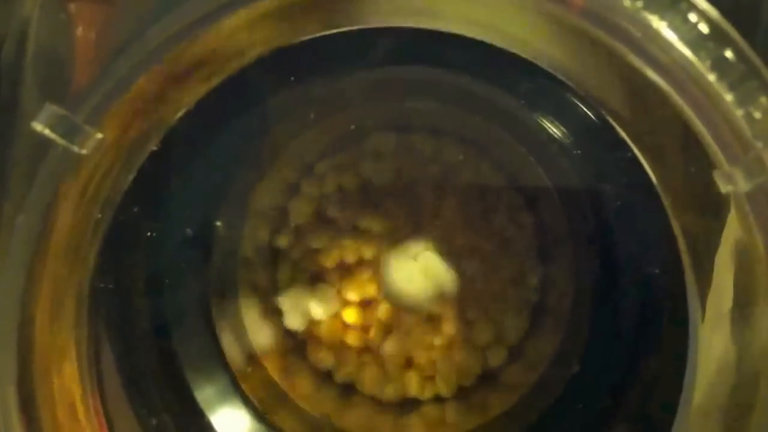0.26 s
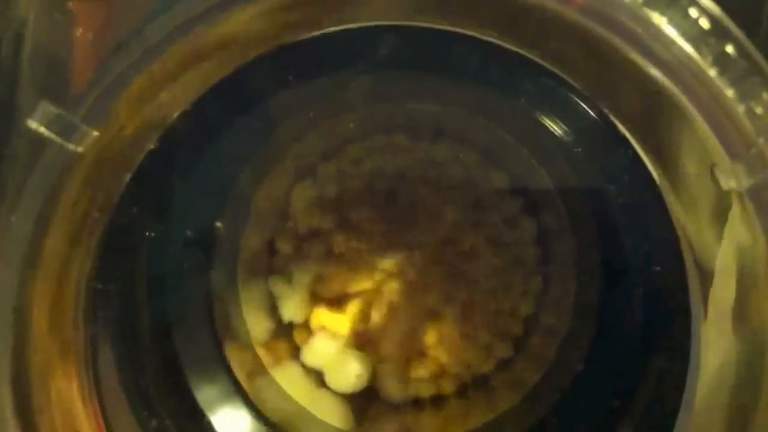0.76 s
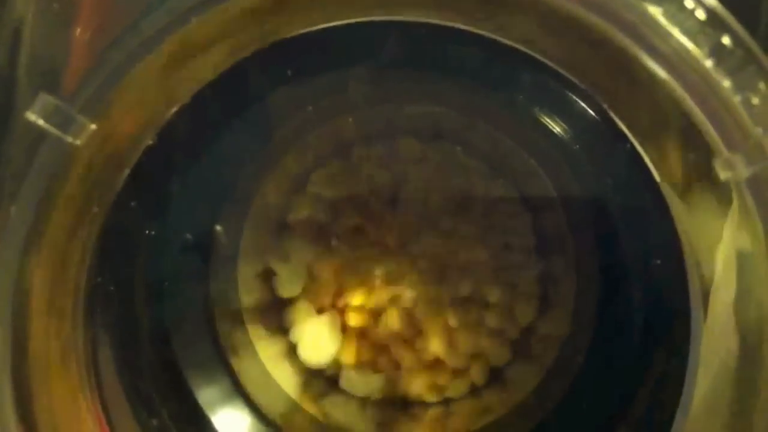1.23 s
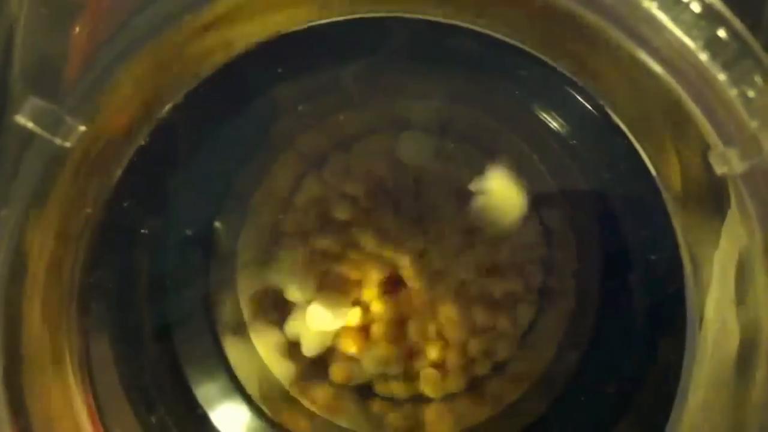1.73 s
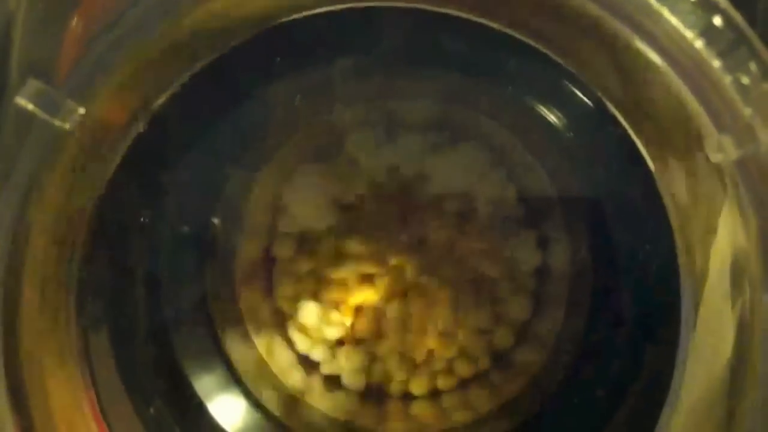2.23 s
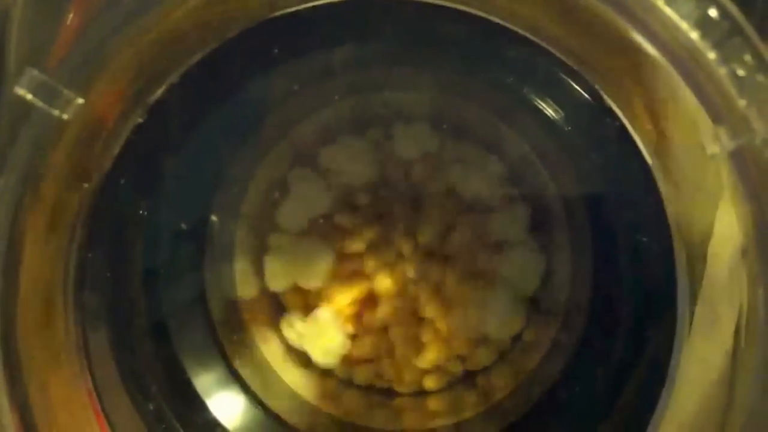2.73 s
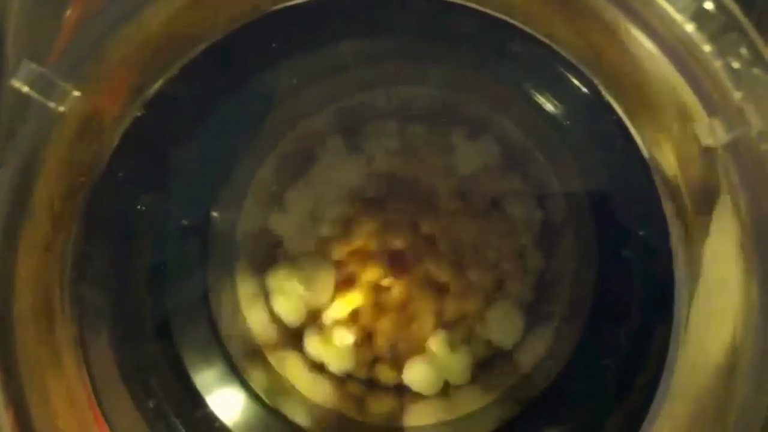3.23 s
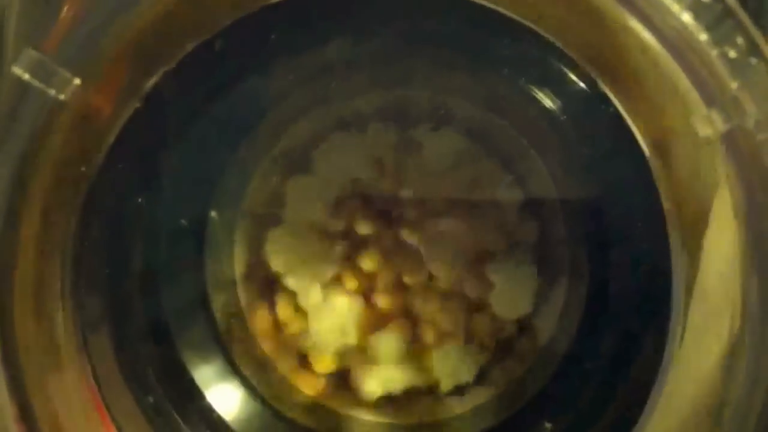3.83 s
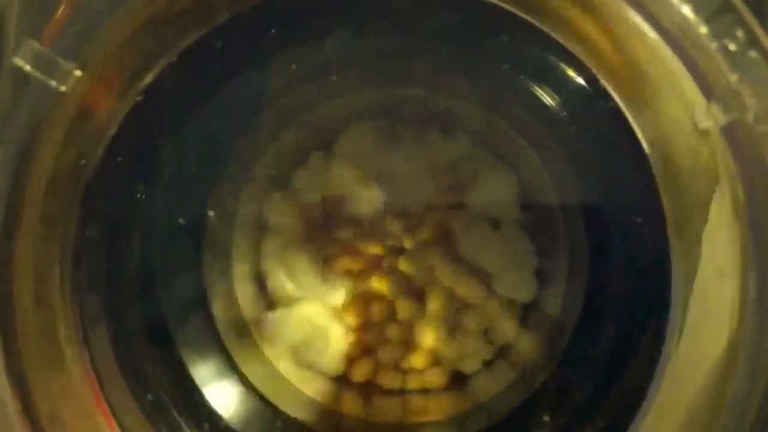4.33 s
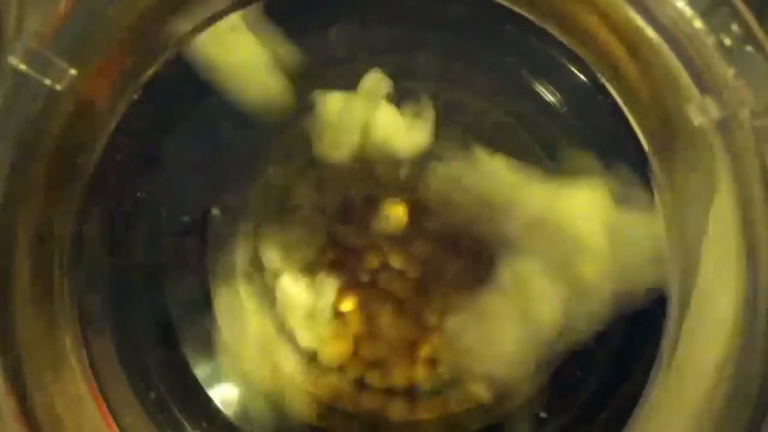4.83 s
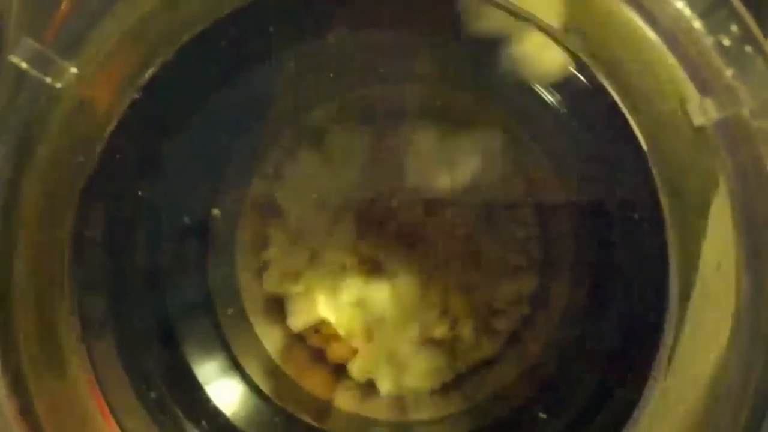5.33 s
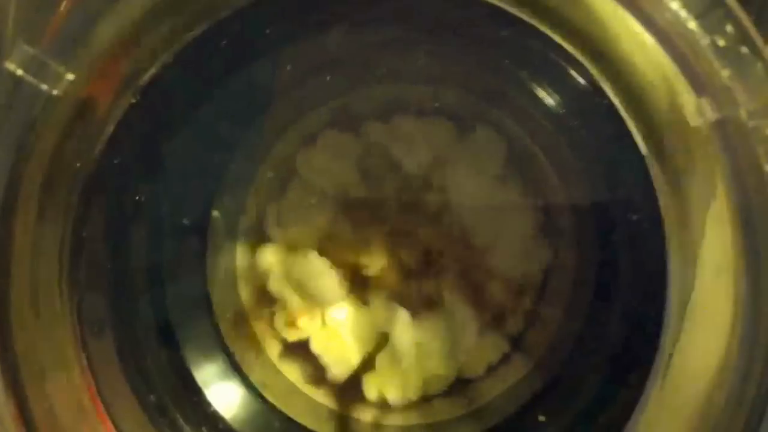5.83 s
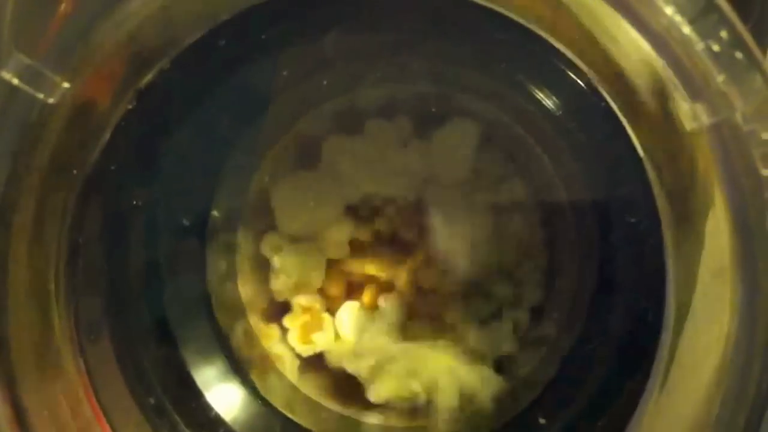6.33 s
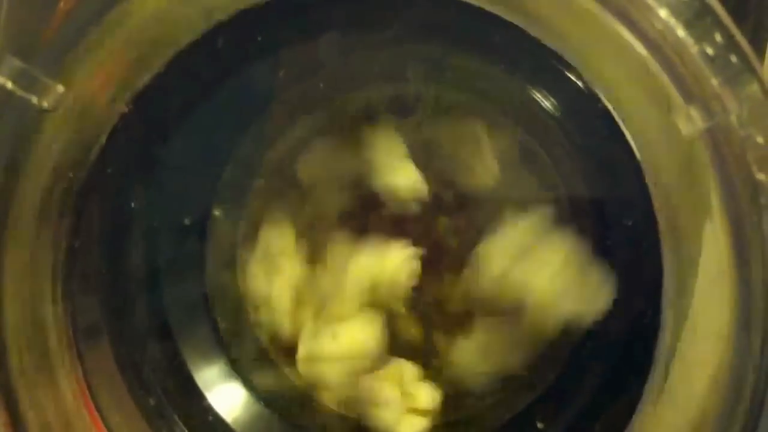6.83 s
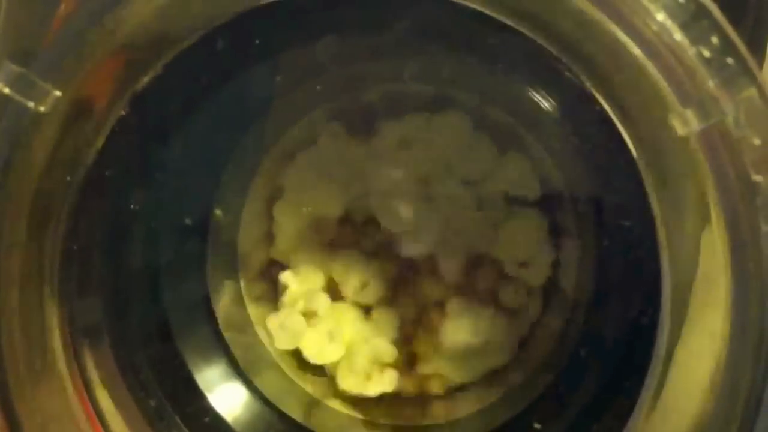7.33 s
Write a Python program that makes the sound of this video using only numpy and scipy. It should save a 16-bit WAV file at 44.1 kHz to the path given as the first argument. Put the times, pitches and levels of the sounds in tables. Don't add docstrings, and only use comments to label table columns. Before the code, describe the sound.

Close above a whirring popcorn machine, blown air rushes through a metal cup as scattered corn pops snap, some crisp, some dull and deep.

```python
import sys
import numpy as np
from scipy import signal
from scipy.fft import rfft, irfft
from scipy.io import wavfile
from scipy.ndimage import uniform_filter1d

SR = 44100
rng = np.random.default_rng(int(sys.argv[2]) if len(sys.argv) > 2 else 0)


def master_out(mix):
    frames = np.transpose(np.atleast_2d(mix))
    ceiling = np.clip(frames, -1, 1)
    pcm = np.round(ceiling * 32767).astype(np.int16)
    wavfile.write(sys.argv[1], SR, pcm)


def linear_from_db(decibels):
    return 10 ** (np.asarray(decibels, float) / 20)


N = 333396

# [t/s, crack rms level/dB, low cup mode/dB, body under the crack/dB, brightness/dB per octave]
MOUTH_POPS = [(1.8812, -14, 20, -6, 6), (1.9094, -25, 13, -1, 7), (2.409, -23, 8, -19, 1),
              (3.87, -24, 20, -15, -4), (4.2734, -22, 10, -18, 3), (5.0144, -20, 16, -8, -2),
              (5.88, -21, 12, -14, 4.5), (6.7573, -19, 11, -16, 2.5), (5.001, -8, 15, -8, -2.5),
              (6.7168, -9.5, 17, -6, -4), (6.8346, -11, 16.5, -9, 1), (7.0918, -18, 9, -5, 5)]
DEEP_POPS = [
    (2.9914, -18, 18, -10, 0),
    (4.3174, -25, 13, -11, -5),
    (4.6254, -19.5, 18, -8, -17),
    (4.8412, -17.5, 17, 0, -1.5),
    (4.8902, -19, 14, -5, -2),
    (7.3878, -21, 22, -12, 6),
]
# [f/Hz, level/dB per Hz]
HULL_CRACK = [(1500, -32), (2500, -0.5), (4000, 0), (6000, 1), (9000, -4), (12000, -6.5), (15500, -26),
              (17000, -72)]
# [f/Hz, width/Hz, lift/dB]
CUP_MODES = [(2450, 600, -6), (4280, 330, -12), (4950, 950, 12), (5800, 380, -9), (6450, 700, 8.5),
             (7800, 700, 6), (9900, 1200, 4.5)]
# [t/s, f/Hz]
SHAFT_SPEED = [
    (0., 231.8),
    (3.65, 233.35),
    (4.15, 232.4),
    (5.4, 232.8),
    (6., 232.7),
    (7.56, 233.25),
]
# [multiple of shaft speed, rms level midway/dB, trend as the cup fills/dB per s]
SHAFT_ORDERS = [(1, -26.1, 0), (2, -38, -.4), (3, -35.8, 1.3), (4, -31.5, -.6), (7, -44, 0), (8, -40, -.5),
                (9, -44.5, .7), (10, -44.5, .1), (11, -43.3, -.7), (12, -44.5, -1.6), (14, -44, -.8),
                (16, -46.5, .4), (18, -49, -1.1), (25, -46, -.2)]
# [f/Hz, level/dB per Hz]
AIR_ROAR = [(60, -50), (100, -54), (150, -25.5), (700, -9), (1350, -19.5), (5500, -22), (11800, -37.5),
            (15500, -52)]
# [f/Hz, width/Hz, lift/dB]
CHAMBER_MODES = [(313, 34, 8), (409.4, 15, 7.5), (850.5, 58, 5.5), (973, 380, 14.5), (1458, 33, 5.5),
                 (1747, 139, 7), (2085, 130, -5.5), (3222, 190, 7.5), (3530, 130, 4.5), (4456, 36, 6.5),
                 (4980, 49, 6), (5350, 47, 7), (6430, 520, 4), (9900, 460, 1),
                 (6120, 450, -8)]
# [t/s, drop/dB, recovery/dB per s]
GAIN_DUCKS = [
    (5.005, 5, 3),
    (6.719, 4.5, 10),
    (6.838, 3, 1),
]
# [f/Hz, share 0-1]
TOP_BAND_KEPT = [(9000, .99), (11000, .88), (12500, .55), (13400, .28), (14200, .035), (15100, .012),
                 (15800, .001)]

MOUTH_MODE_HZ, DEEP_MODE_HZ = 3600, 3100
MOUTH_THUMP_HZ, DEEP_THUMP_HZ = 160, 240
FAINT_ORDERS = (5, 13, 15, 17, 20, 28, 30, 31, 39)


def pop(row, low_hz, thump_hz, chance):
    _, db, low_db, body_db, bright_db = row
    tear, steam = chance
    t = np.arange(len(tear)) / SR
    rise = 1 - np.exp(-t / .0004)
    tear_s = .0044 * linear_from_db(.3 * (-8 - db))
    cracks = np.sign(tear) * rise * np.exp(-(t / tear_s) ** 3)
    hiss = steam * rise * linear_from_db(-60 * t / .085)

    hz = np.fft.rfftfreq(len(t), 1 / SR)
    colour_db = lifted(HULL_CRACK, CUP_MODES + [(low_hz, 950, low_db)], hz)
    colour_db = colour_db + bright_db * np.log2(np.maximum(hz / 4000, 1))
    own_db = 10 * np.log10(uniform_filter1d(abs(rfft(cracks)) ** 2, size=30))
    crack = coloured(cracks, colour_db - own_db + own_db.mean())
    steam_tilt_db = 3.5 * np.log2(hz / 4000 + 0.12)
    crack = crack + linear_from_db(-7.5) * coloured(hiss, colour_db + steam_tilt_db)

    body = resonate(resonate(cracks + .45 * hiss, 1500, 1100), 1500, 1100)
    swell = np.sin(np.pi * np.minimum(t * thump_hz / 2, 1)) ** 2
    thump = np.sin(2 * np.pi * thump_hz * t) * swell
    thump_db = -11 + 10 * (low_hz < MOUTH_MODE_HZ)

    scale = np.sqrt(tear_s * SR)
    crack = scale * crack / np.linalg.norm(crack)
    body = scale * body / np.linalg.norm(body)
    return linear_from_db(db) * (crack + linear_from_db(body_db) * (body + linear_from_db(thump_db) * thump))


def motor(waver_db=2.1):
    s, hz = np.transpose(SHAFT_SPEED)
    t = np.arange(N) / SR
    orders = SHAFT_ORDERS + [(k, -42 - .42 * k, 0) for k in FAINT_ORDERS]
    jitter, *wavers = drift(8, count=len(orders) + 1)
    speed_hz = np.interp(t, s, hz) + .12 * jitter
    turn = 2 * np.pi * np.cumsum(speed_hz) / SR
    out = np.zeros(N)
    for (k, db, trend_db), waver, start in zip(orders, wavers, rng.random(len(wavers))):
        depth_db = waver_db * min(.12 * k ** 1.2, 1)
        level_db = db + trend_db * (t - t.mean()) + depth_db * (waver - .4)
        out += np.sqrt(2) * linear_from_db(level_db) * np.cos(k * turn + 2 * np.pi * start)
    return out


def air(level_db=-17.5, patchy_db=0.78, hiss_db_per_s=-0.29):
    frames, hz = N // 512 + 5, np.fft.rfftfreq(2048, 1 / SR)
    a, b, patches = rng.standard_normal((frames, 1025, 3)).T
    patches = evened(uniform_filter1d(uniform_filter1d(patches, 16, 0), 8, 1))
    ripple_db = 1.3 * evened(uniform_filter1d(rng.standard_normal(1025), 2)) * (hz > 1300)
    from_middle_s = (np.arange(frames) - frames / 2) * 512 / SR
    hiss_db = np.outer(hz > 2000, hiss_db_per_s * from_middle_s)
    steady_db = lifted(AIR_ROAR, CHAMBER_MODES, hz) + ripple_db
    z = (a + 1j * b) * linear_from_db(steady_db[:, None] + patchy_db * patches + hiss_db)
    roar = signal.istft(z, nperseg=2048, noverlap=1536)[1][:N]
    return linear_from_db(level_db) * evened(roar)


def rattle(level_db=-46, ticks_per_s=180):
    strength = linear_from_db(3.5 * np.minimum(rng.exponential(1, N), 4))
    ticks = strength * (rng.random(N) < ticks_per_s / SR)
    spot = rng.integers(0, 8, N)
    out = np.zeros(N)
    for k, hz in enumerate(np.geomspace(2600, 9000, num=8)):
        out += resonate(resonate(ticks * (spot == k), hz, 700), hz, 700) * linear_from_db(-3.0 * k)
    return linear_from_db(level_db) * evened(out)


def evened(x):
    return x / np.sqrt(np.mean(x ** 2) + 1e-20)


def drift(top_hz, count):
    hz = np.geomspace(.15, top_hz, 12)
    t = np.arange(0, N + 512, 512) / SR
    phase = hz[:, None] * t + rng.random((count, 12, 1))
    waves = np.sin(2 * np.pi * phase) / np.sqrt(hz)[:, None]
    return [np.interp(np.arange(N) / SR, t, evened(w.sum(0))) for w in waves]


def resonate(x, hz, width):
    r = np.exp(-np.pi * width / SR)
    return 2 * signal.lfilter([1 - r], [1, -r * np.exp(2j * np.pi * hz / SR)], x).real


def read(points, hz):
    f, value = np.transpose(points)
    return np.interp(np.log(hz + 1), np.log(f + 1), value)


def lifted(points, modes, hz):
    return read(points, hz) + sum(db / (1 + (2 * (hz - f) / w) ** 2) for f, w, db in modes)


def coloured(x, db):
    log_gain = np.log(linear_from_db(np.r_[db, db[-2:0:-1]]))
    lag = -signal.hilbert(log_gain).imag[:len(db)]
    return irfft(rfft(x) * linear_from_db(db) * np.exp(1j * lag))


def add(mix, s, sound):
    part = mix[round(s * SR):][:len(sound)]
    part += sound[:len(part)]


def scene():
    bursts = np.zeros(N)
    places = ((MOUTH_POPS, MOUTH_MODE_HZ, MOUTH_THUMP_HZ), (DEEP_POPS, DEEP_MODE_HZ, DEEP_THUMP_HZ))
    for rows, low_hz, thump_hz in places:
        for row, chance in zip(rows, rng.standard_normal((len(rows), 2, 8192))):
            add(bursts, row[0], pop(row, low_hz, thump_hz, chance))
    bursts = signal.lfilter(*signal.butter(2, 85, "high", fs=SR), bursts)
    return (motor() + air() + rattle() + bursts)[None]


def thin_top_band(x, gain):
    hz, frame_s, z = signal.stft(x, SR, "cosine", nperseg=2048)
    power = abs(z / np.interp(frame_s, np.arange(N) / SR, gain)) ** 2
    steady = uniform_filter1d(np.median(power, axis=2), size=15) / np.log(2)
    limit = -np.log(read(TOP_BAND_KEPT, hz)) * steady * (hz > TOP_BAND_KEPT[0][0])
    dropped = z * ((power < limit[..., None]) | (hz > 15850)[:, None])
    return x - signal.istft(dropped, SR, "cosine", nperseg=2048)[1][:, :N]


def band_limit(x):
    return signal.sosfilt(signal.butter(12, 16390, fs=SR, output="sos"), x)


def record(dry):
    t = np.arange(N) / SR
    cut_db = np.zeros(N)
    for s, drop_db, recover_db in GAIN_DUCKS:
        cut_db = np.where(t < s, cut_db, np.maximum(drop_db - recover_db * (t - s), 0))
    gain = linear_from_db(-uniform_filter1d(cut_db, 130))
    ducked = dry * gain
    limited = ducked / (1 + (ducked / .98) ** 6) ** (1 / 6)
    mix = thin_top_band(limited, gain)
    return band_limit(mix)


dry = scene()
out = record(dry)
master_out(out)
```